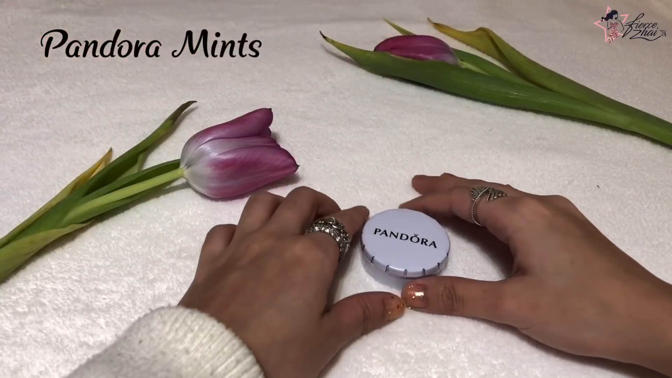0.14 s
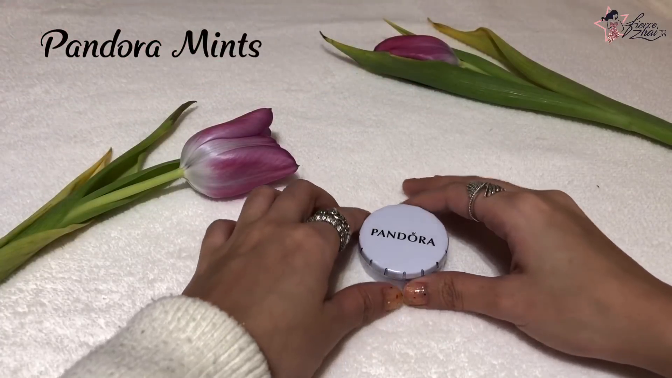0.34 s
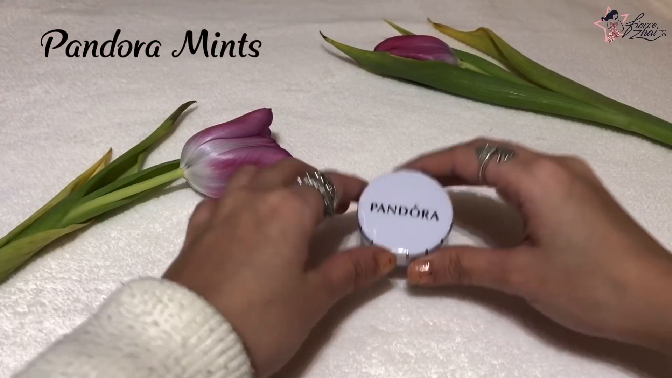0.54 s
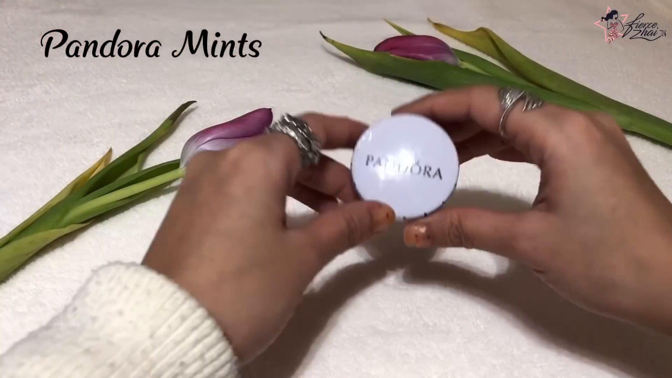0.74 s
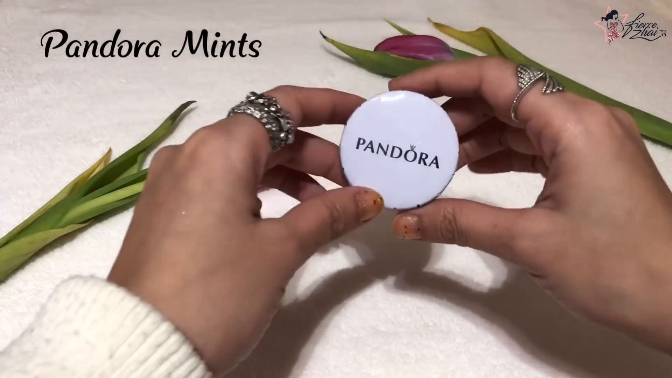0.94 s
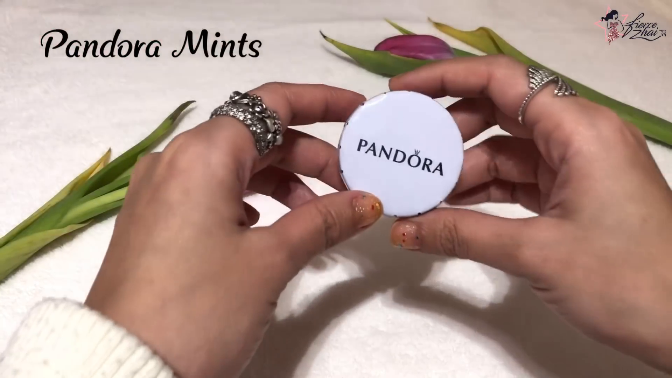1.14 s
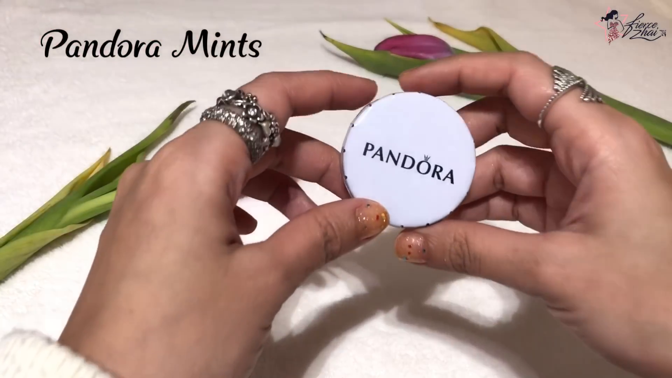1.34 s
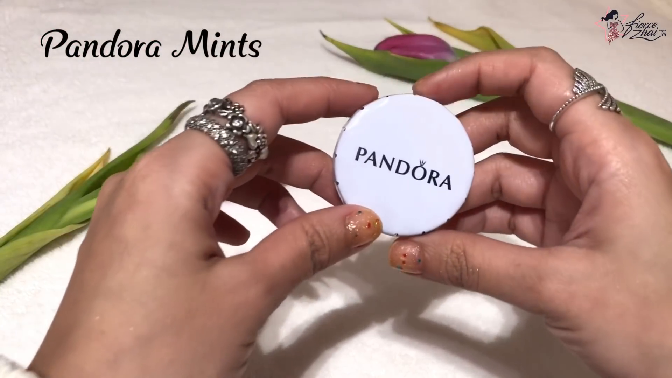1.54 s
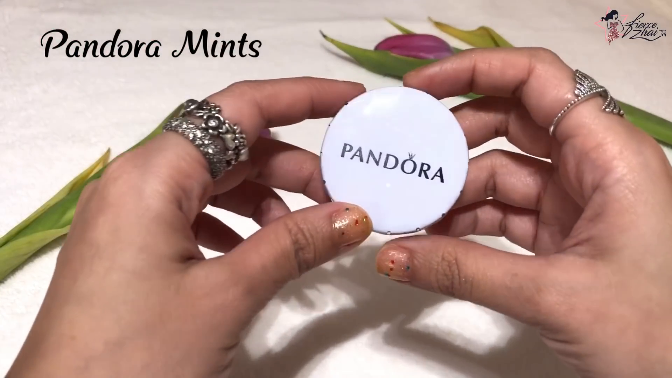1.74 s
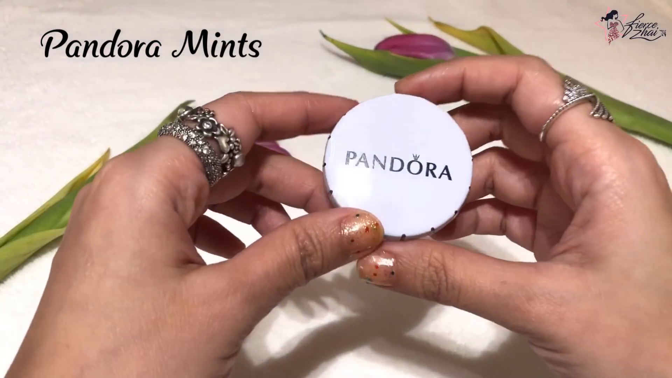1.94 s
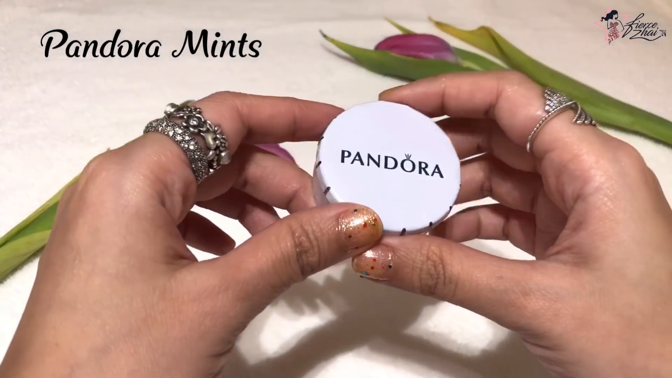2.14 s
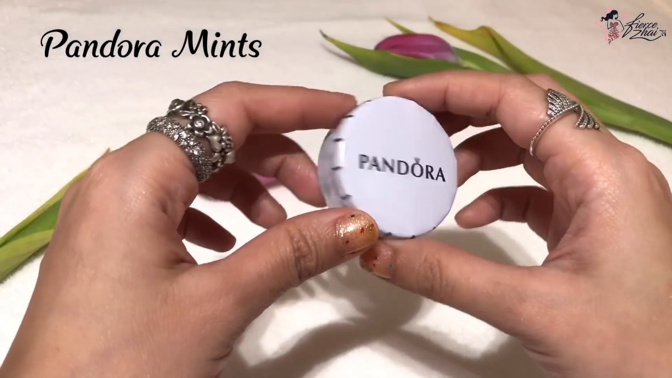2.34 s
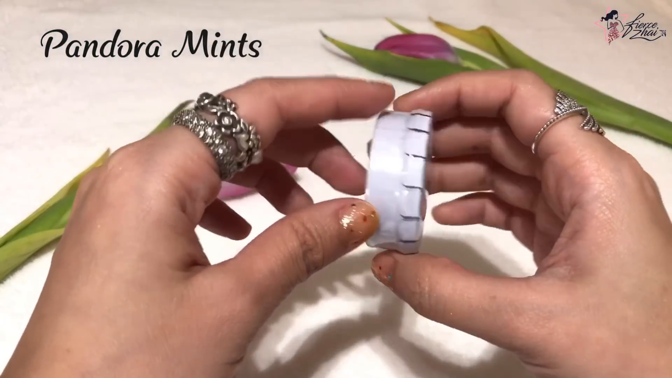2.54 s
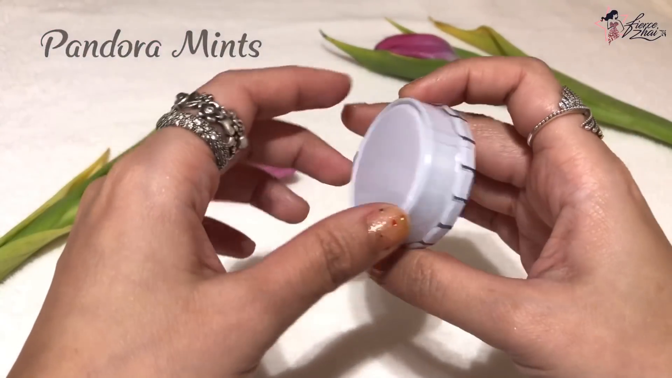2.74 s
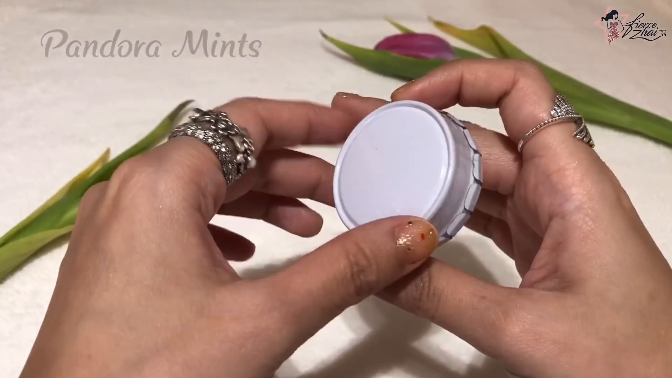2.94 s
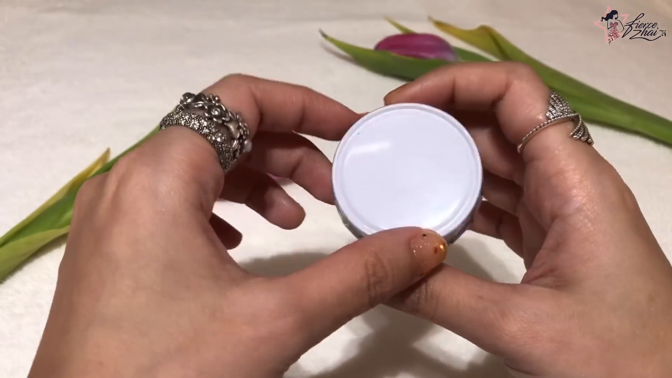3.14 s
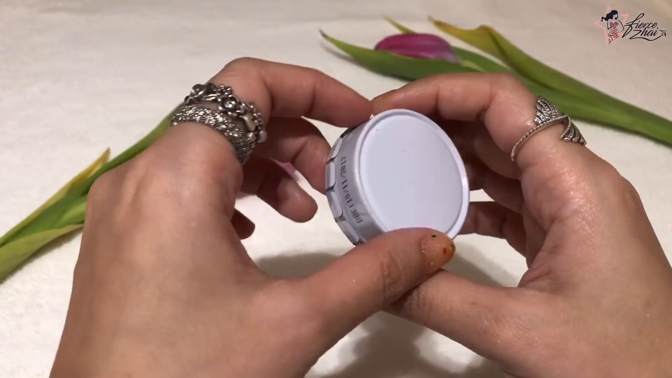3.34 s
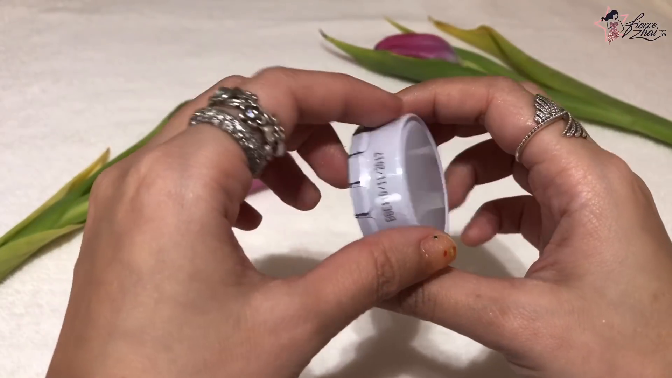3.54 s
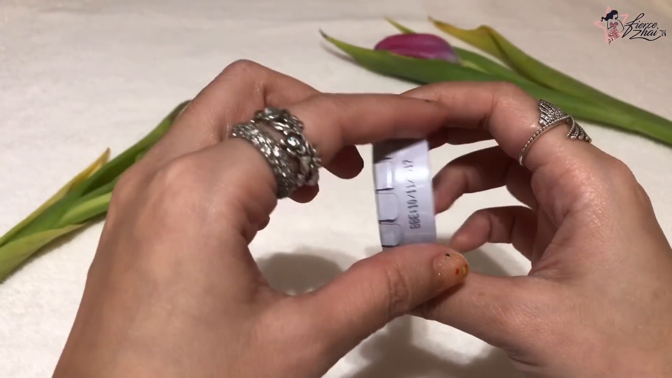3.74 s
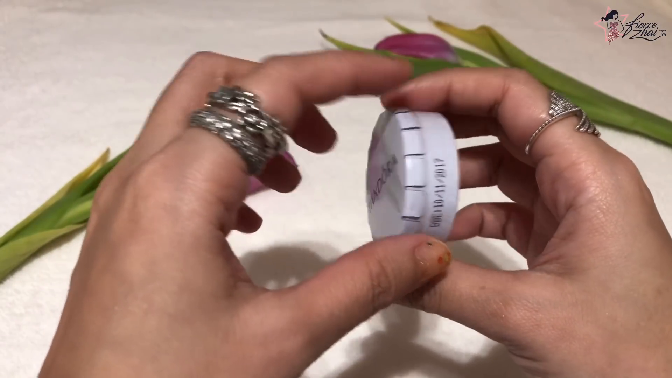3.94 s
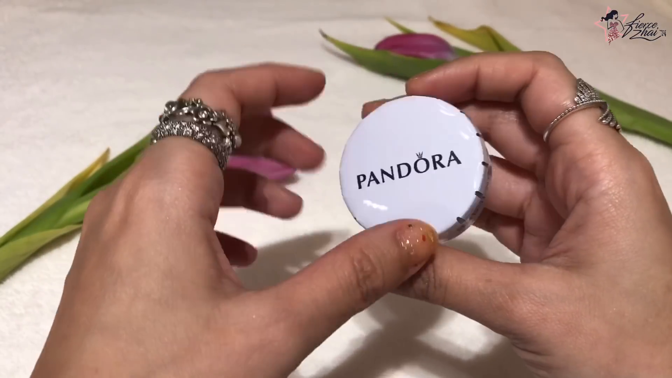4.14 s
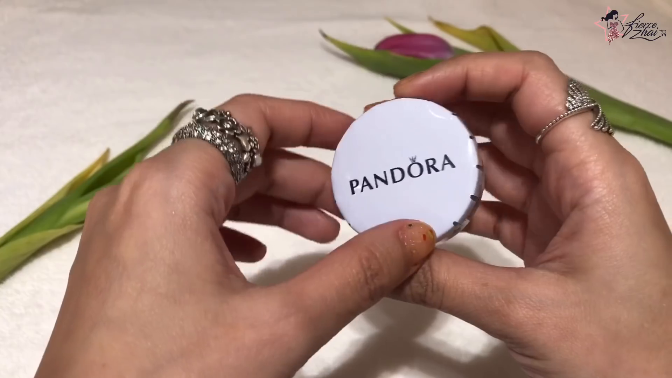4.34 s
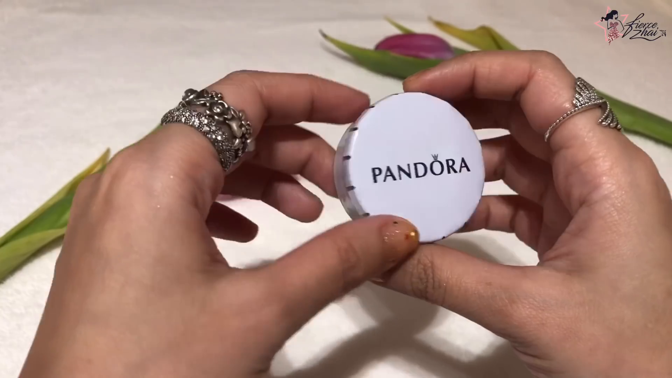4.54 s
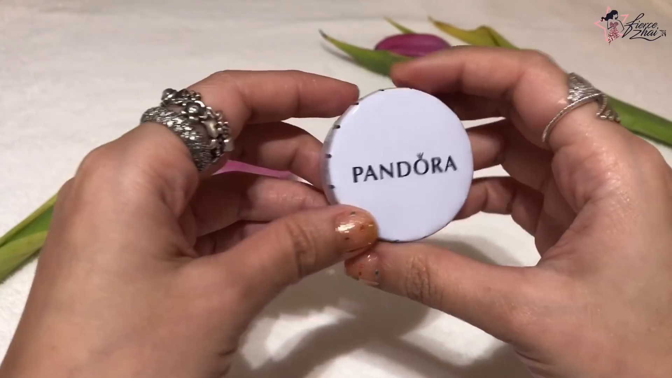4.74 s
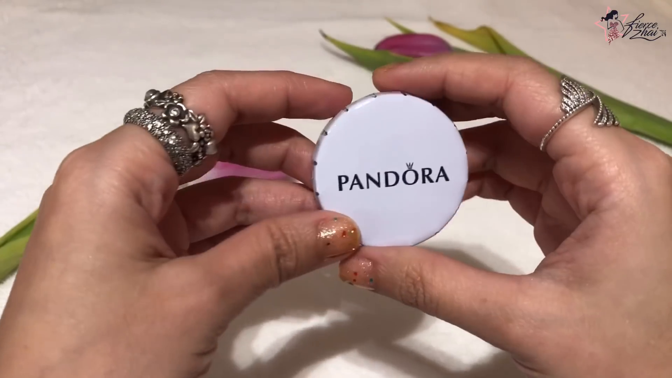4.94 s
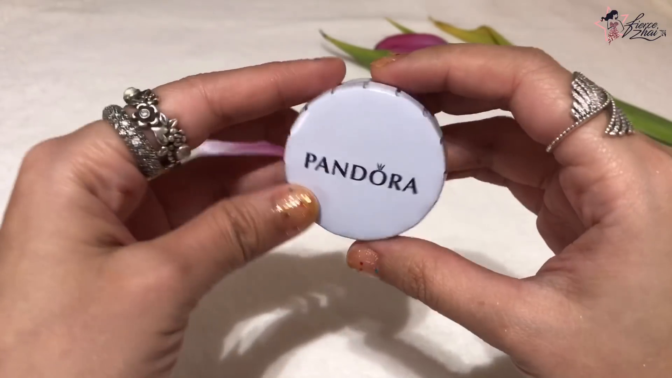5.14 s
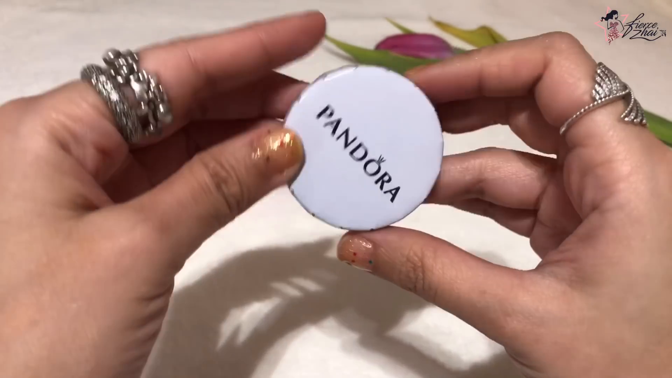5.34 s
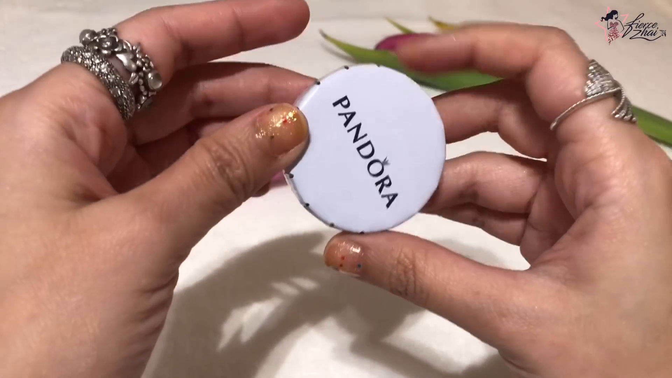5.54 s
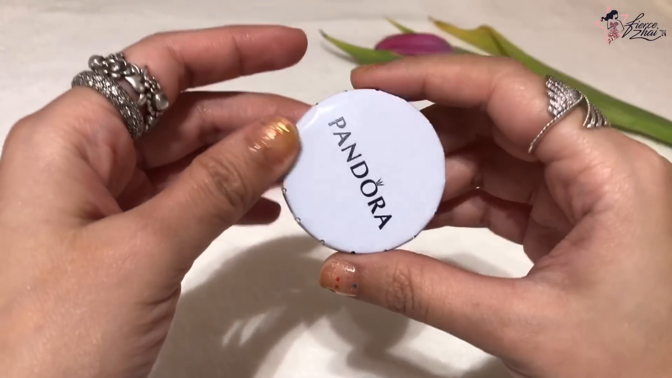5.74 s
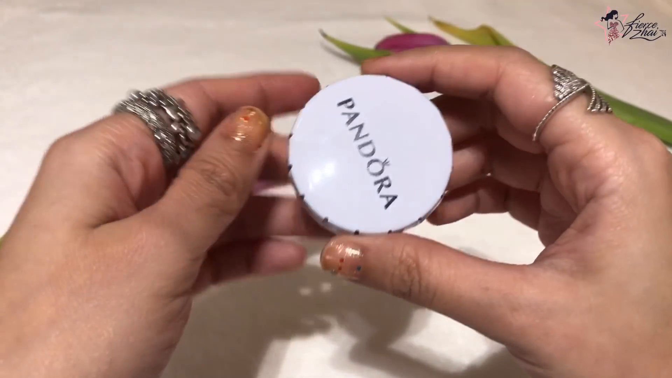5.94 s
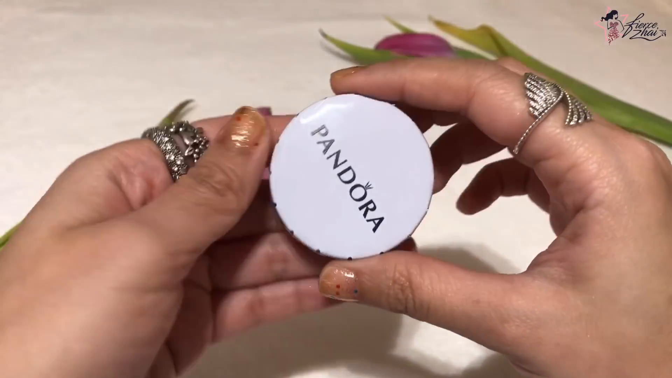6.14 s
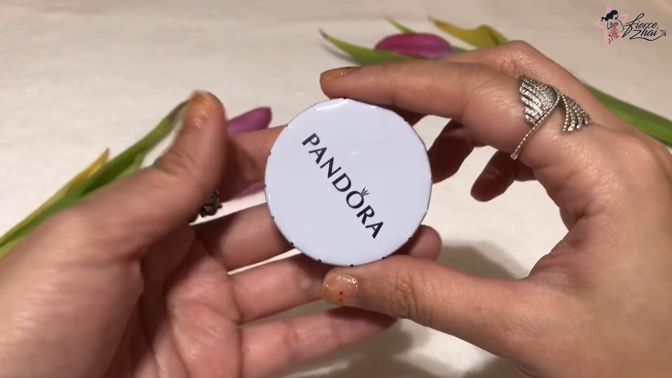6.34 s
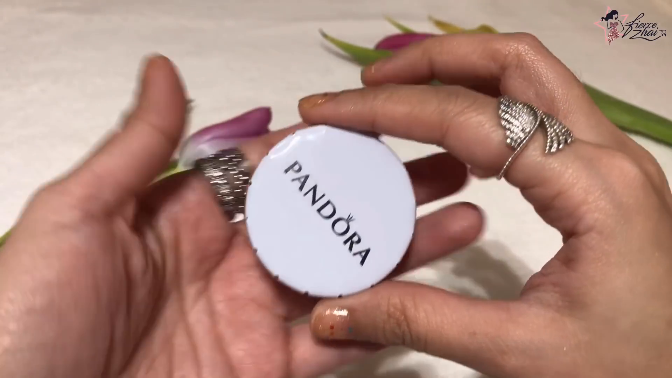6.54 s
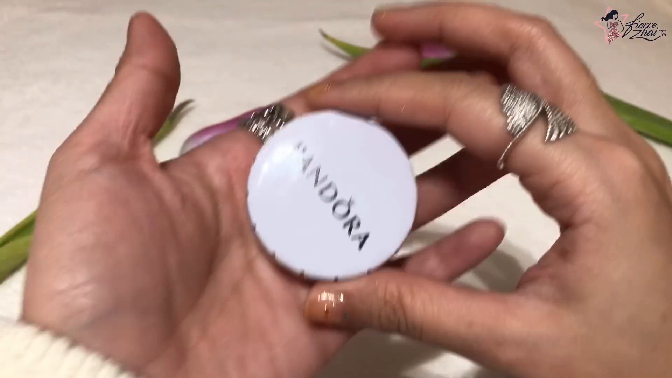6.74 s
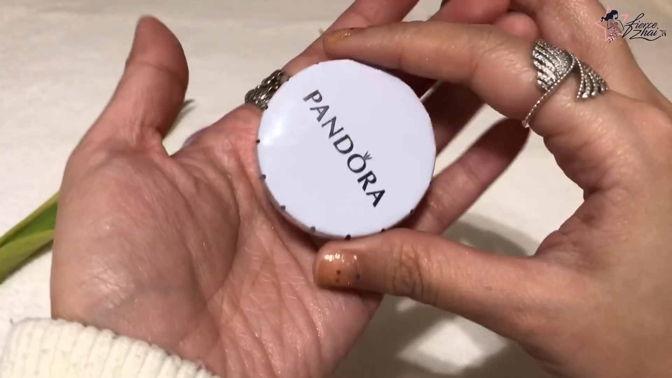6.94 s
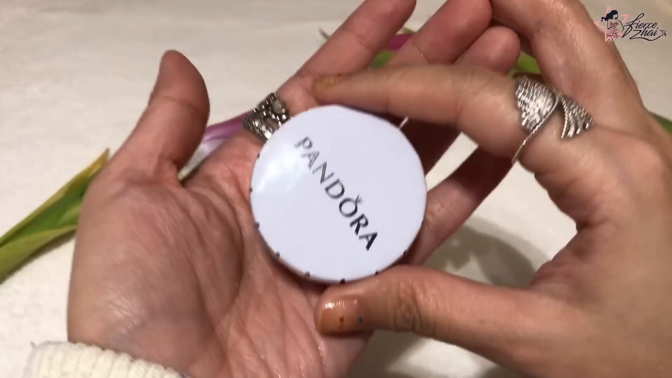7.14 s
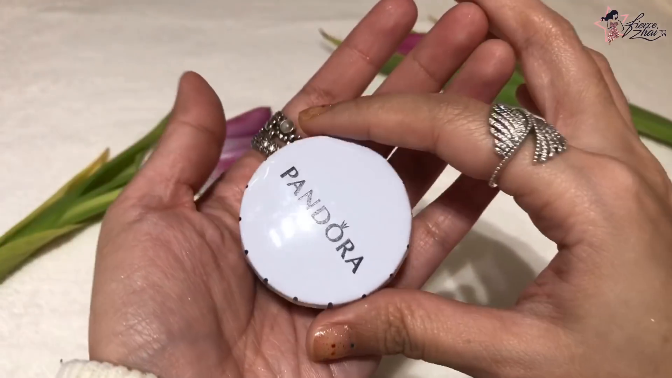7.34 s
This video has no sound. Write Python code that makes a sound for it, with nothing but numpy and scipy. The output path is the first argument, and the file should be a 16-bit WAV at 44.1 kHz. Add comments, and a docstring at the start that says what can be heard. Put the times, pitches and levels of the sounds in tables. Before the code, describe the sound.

In a quiet furnished room with low hum and light hiss, a small tin of hard mints is handled close to the microphone. A few faint clicks come first, then a turn sends the candies sliding and clattering in bright, dry metallic bursts. A louder flip follows, then a lighter rattle. Near the end one hand softly bumps the other and rubs skin.

```python
"""A quiet furnished room hums under microphone hiss: shaped noise, its lowest band swelling and fading.
Small hard candies start to slide in a round sheet-metal tin turned in the hands: dense ticks through its modes.
Those that land ring the tin close to the microphone: each blow is a burst of decaying sines with a noise crack.
A short noise tail gives the room's answer to the tin.
Near the end one hand bumps the other in low pulses, then rubs it: shaped noise with a faint sine squeak."""
import sys
import numpy as np
from scipy import signal
from scipy.fft import rfft, irfft, next_fast_len
from scipy.io import wavfile
from scipy.ndimage import uniform_filter1d

SR = 44100
rng = np.random.default_rng(int(sys.argv[2]) if len(sys.argv) > 2 else 0)


def pcm_store(signal):
    """Save signal as 16-bit PCM."""
    levels = np.round(np.clip(np.atleast_2d(signal), -1, 1) * 32767)
    wavfile.write(sys.argv[1], SR, levels.astype(np.int16).T)


N = 329690


def amp(db):
    """Decibels to gain."""
    return 10 ** (np.asarray(db) / 20)


def unit(x):
    """Scale a signal to rms 1."""
    return x / np.sqrt(np.mean(x ** 2) + 1e-20)


def along(points, hz):
    """Read a curve of (Hz, value) points on a log frequency axis."""
    point_hz, value = np.transpose(points)
    return np.interp(np.log(hz + 1), np.log(point_hz + 1), value)


def level_curve(rows):
    """Join (s, dB) points into one gain per sample."""
    s, db = np.transpose(rows)
    return amp(np.interp(np.arange(N) / SR, s, db))


def filtered(x, response):
    """Multiply the spectrum of x by a complex response of frequency."""
    m = next_fast_len(N + SR // 2)
    return irfft(rfft(x, m) * response(np.fft.rfftfreq(m, 1 / SR)), m)[..., :N]


QUIET_TOP_HZ = 15900  # hiss and skin noise stop here
HUM_DB = -68  # rms of hum and hiss together
# Tone of the room hum and hiss: pitch_hz [Hz], relative_db [dB per Hz]
HUM_TONE = [(44, -33), (75, -3.5), (192, -2.5), (413, -10.5), (707, -14), (774, -14.5), (1390, -20.5),
            (1770, -21), (2080, -22), (2320, -23), (16000, -32.5)]
# Swell of the lowest hum band: time_s [s], level_db [dB rms]
DRONE_LEVEL = [(0.25, -76), (1.3, -76.5), (2, -76), (2.6, -70), (3.2, -70), (4, -76), (4.7, -75),
               (5.5, -76), (6.2, -72.5), (7.2, -77)]


def hum():
    """Steady room hum and hiss are shaped noise; a narrow low band swells and fades."""
    noise = filtered(rng.standard_normal(N), lambda hz: amp(along(HUM_TONE, hz)) * (hz < QUIET_TOP_HZ))
    low_tone = [(15, -40), (30, -22.5), (54, 12), (75, -7.0), (100, -41.5)]  # (Hz, dB)
    drone = filtered(rng.standard_normal(N), lambda hz: amp(along(low_tone, hz)))
    return amp(HUM_DB) * unit(noise) + level_curve(DRONE_LEVEL) * unit(drone)


def ticks(rate, spread_db, soft_hz):
    """Random tiny contacts, most weak and a few strong; a soft contact carries little treble."""
    chance, size, sign = rng.random(N), rng.exponential(size=N), rng.standard_normal(N)
    contacts = (chance < rate / SR) * amp(spread_db * np.minimum(size, 3)) * sign
    return filtered(contacts, lambda hz: 1 / (1 + 1j * hz / soft_hz) ** 2)


def resonances(modes, damping):
    """Response of a set of modes; damping divides every ring time."""
    def response(f):
        total = 0
        for k, (hz, lid_db, base_db, t60) in enumerate(modes):
            width = damping * np.log(1000) / np.pi / t60
            strength = (-1) ** k * amp((lid_db + base_db) / 2)
            total = total + strength * 1j * f * width / (hz * hz - f * f + 1j * f * width)
        return total
    return response


# Modes of the tin's five parts, for slides and landings alike: pitch_hz [Hz],
# lid_db [dB when the lid is struck], base_db [dB when the base is struck], t60_s [s, before damping or freedom]
FACE_MODES = [(1584, -14, 5.5, 0.0039), (1857, 0.5, -1, 0.01), (2060, 5.5, -4.5, 0.011)]
DOME_MODES = [(3000, -7.5, 2, 0.0092), (3220, -1, -5.5, 0.0086), (3630, -8, -16.5, 0.0087)]
WALL_MODES = [(4190, 7, -17, 0.0096), (4660, -0.5, -7.5, 0.016), (4777, -8.5, -2, 0.012),
              (5280, -5.5, -8, 0.014), (6300, -8, -11.5, 0.0089), (6850, -7, -4.5, 0.011),
              (7090, -17.5, -4.5, 0.015)]
RIM_MODES = [(8870, 1.5, -13.5, 0.01), (9350, -2.5, -16.5, 0.017), (9550, -12, -5, 0.013),
             (10040, -7.5, -14.5, 0.014)]
EDGE_MODES = [(10790, -1.5, -15, 0.012), (11600, 2, -14, 0.011), (12480, -9, 1, 0.012),
              (13480, -7.5, -9, 0.01), (15500, -18, -14, 0.009)]
RISE_DB_PER_S, FALL_DB_PER_S = 419.5, 262  # a slide gathers, then settles
# Slides of the heap: start_s [s, full level reached], hold_s [s], level_db [dB rms on faces and dome],
# wall_db [dB, wall, rim and edge relative to level_db]
SLIDES_OF_HEAP = [(0.723, 0.12, -72, -8), (0.95, 0.054, -71, -17), (1.308, 0.16, -73.5, -8),
                  (2.54, 0.093, -58, -4.5), (2.746, 0.084, -61.5, -0.5), (3.01, 0.072, -75, 0.5),
                  (3.197, 0.2, -59, -7.5), (3.435, 0.031, -52, 1.5), (3.543, 0.24, -71, 0),
                  (3.9, 0.024, -67, -8), (4.124, 0.11, -57, -0.5), (4.575, 0.14, -58.5, -5.5),
                  (4.756, .05, -71.5, -3), (5.42, 0.13, -57.5, -8), (5.563, 0.067, -56.5, -10),
                  (5.66, 0.084, -65, -6), (5.307, 0.046, -68, -9), (6.02, 0.12, -70, -9.5)]


def sliding():
    """The heap shifts as a dense patter through the tin's modes, the wall group damped much the most."""
    t = np.arange(N) / SR
    low_gain, high_gain = np.zeros((2, N))
    for s, hold, db, wall_db in SLIDES_OF_HEAP:
        gathering = RISE_DB_PER_S * np.maximum(s - t, 0)
        settling = FALL_DB_PER_S * np.maximum(t - s - hold, 0)
        gain = amp(db - gathering - settling)
        low_gain = low_gain + gain
        high_gain = high_gain + amp(wall_db) * gain
    face_ticks = ticks(1100, spread_db=4.0, soft_hz=1910)  # rate in contacts per second
    wall_ticks = ticks(600, spread_db=4.0, soft_hz=4200)
    faces = filtered(face_ticks, resonances(FACE_MODES + DOME_MODES, damping=0.95))
    wall = filtered(wall_ticks, resonances(WALL_MODES + RIM_MODES + EDGE_MODES, damping=3.2))
    return low_gain * unit(faces) + high_gain * unit(wall)


# Decay of the room's answer: pitch_hz [Hz], t60_s [s]
ROOM_DECAY = [(1000, 0.22), (4000, 0.11), (12000, 0.12)]


def room(x):
    """A noise tail answers x about 3 ms late; each frequency dies at its own speed."""
    hz, t, z = signal.stft(rng.standard_normal(SR // 2), SR, nperseg=256)
    decay = amp(-60 * t / along(ROOM_DECAY, hz)[:, None])
    tail = signal.istft(z * decay, SR, nperseg=256)[1]
    return signal.fftconvolve(np.pad(x, (150, 0)), tail / np.linalg.norm(tail))[:N]


MIDDLE_HZ = 4700  # brightness turns about this pitch
SPOT_DB, SPOT_REACH = 10, 0.23  # lift of the modes the spot favours; its reach in octaves


def ring(modes, colour, lift, crack, spread_db, linger_db):
    """A blow on one part sounds its modes, weighted by the spot struck; bare contact adds a broad crack."""
    t = np.arange(SR // 6) / SR
    hz, lid_db, base_db, t60 = np.transpose(modes)[..., None]
    base, freedom = np.clip(colour[0], 0, 1), colour[1]
    bright_db, spot_hz = lift
    draw = rng.standard_normal((3, len(modes), 1))  # strength, pitch and phase of each mode

    usual = amp(lid_db + base * (base_db - lid_db))
    near = np.exp(-.5 * (np.log2(hz / spot_hz) / SPOT_REACH) ** 2)
    lifted = usual * amp(bright_db * np.log2(hz / MIDDLE_HZ) + SPOT_DB * near)
    strength = lifted * amp(spread_db * draw[0])

    # the candy lying on the metal damps the first loud ring; a faint one lingers, mostly in the one-piece base
    loud_fall = amp(-60 * t / (freedom * t60))
    faint_fall = amp(linger_db - 18 * (1 - base) - 60 * t / (8.5 * freedom * t60))
    pitch = hz * (1 + 0.023 * (1.03 - base) * draw[1])  # the loose slotted lid never rings twice alike
    waves = np.sin(2 * np.pi * pitch * t + 2 * draw[2])
    tones = np.sum(strength * (loud_fall + faint_fall) * waves, axis=0)

    edges = np.clip([0.62 * hz.min(), 1.08 * hz.max()], 100, 14500)
    band = signal.butter(3, edges, "band", fs=SR, output="sos")
    noise = signal.sosfilt(band, rng.standard_normal(len(t)))
    crack_sound = crack * (1 - .5 * base) * unit(noise) * amp(-60 * t / 0.0089)
    blow = tones / np.linalg.norm(strength) + crack_sound
    blow = blow * (1 - np.exp(-t / .0006))  # the contact builds up
    # level the loudest 30 samples like a sine of peak 1, then restore the lift
    loudest = np.sqrt(2 * uniform_filter1d(blow ** 2, size=30).max())
    return blow / loudest * np.linalg.norm(lifted) / np.linalg.norm(usual)


# How the blows ring over time: time_s [s], base_share [0-1, base colour against lid colour],
# freedom [factor on every t60, how long the blows ring]
BLOW_COLOUR = [(0, 0, 0.92), (2.4, .05, 0.92), (2.65, 0.23, 0.97), (2.95, 0.44, 0.79), (3.26, 0.66, 1.34),
               (3.449, 0.59, .62), (3.64, 0.94, 0.87), (3.88, .3, 0.55), (3.92, 0.77, 0.57),
               (4.202, 1, 0.85), (4.45, 0.96, 0.37), (4.66, 0.8, 0.83), (5.1, 0.07, 0.62), (6.2, .1, 0.39)]
# How readily faces, dome, wall, rim and edge sound, a row each:
# lid_db [dB when the lid is struck], base_db [dB when the base is struck]
PART_READINESS = [(-0.5, 3), (1.8, -4), (2.5, 5.5), (-1, 1), (2.5, -2)]
# Candy landings: start_s [s], level_db [dB, before part readiness and lift],
# bright_db [dB per octave], spot_hz [Hz, favoured by the spot struck]
LANDINGS = [(0.8493, -55.5, 5, 10600), (0.8603, -50.5, -3.5, 4370), (1.0398, -54, 2, 12400),
            (1.4058, -74, -11, 4090), (1.4196, -66.5, -7, 3780), (1.4513, -46.5, 9, 2920),
            (2.1629, -68.2, -10.5, 5790), (2.191, -58.5, 3, 4560), (2.24, -68.5, 4, 4700),
            (2.5564, -49.5, 1.7, 6650), (2.5607, -47.5, -5, 3900), (2.577, -41, -1.2, 12500),
            (2.5845, -48, -1, 2720), (2.598, -33, -2.5, 4870), (2.6016, -41, 4, 5790),
            (2.6157, -51, 8, 5040), (2.621, -45.8, 4, 5400), (2.6258, -50.4, -3.3, 5040),
            (2.6383, -30.5, -3.5, 5200), (2.698, -43.5, -3.8, 5040), (2.733, -68, -10, 5040),
            (2.7431, -53, 0, 4390), (2.75, -56, -3.5, 1780), (2.766, -51, -4, 4780),
            (2.7757, -57, -4, 3560), (2.7933, -41.5, 1, 5300), (2.8058, -45.5, -1.0, 8180),
            (2.8216, -53, 0, 4700), (2.852, -63.5, 6, 12400), (2.8681, -60.4, -13, 12400),
            (2.9354, -36.5, -3.5, 5460), (3.021, -59, -4, 5200), (3.0395, -65.2, -9.5, 5100),
            (3.1994, -56, -1, 1780), (3.2094, -57.5, -5.3, 7120), (3.2207, -49.5, 1.5, 2520),
            (3.2553, -41, 1.7, 5440), (3.268, -55, 1.5, 12400), (3.2867, -59.5, -9.5, 8180),
            (3.3168, -54, -1, 5400), (3.3208, -51, -0.2, 8180), (3.3577, -58, -10, 5400),
            (3.3766, -51.5, 7, 4650), (3.3924, -59, -11, 5790), (3.4087, -67, -11.1, 5400),
            (3.4299, -35, -1.5, 5360), (3.4343, -39.5, -2, 8180), (3.4393, -36.7, 0.8, 2280),
            (3.4445, -39.5, 3.5, 10000), (3.4532, -46, 7, 5400), (3.4656, -48, 1, 9400),
            (3.4816, -34, 3.0, 3700), (3.5068, -59.0, -4.4, 5790), (3.5465, -55.5, -2, 2700),
            (3.5572, -53.4, -3, 2520), (3.5828, -47.5, 1.7, 8500), (3.6176, -62, -6, 4670),
            (3.6437, -36.5, 2.5, 12900), (3.7094, -61.5, -6.9, 2630), (3.721, -61, -1.4, 1780),
            (3.7611, -52, -0.3, 3450), (3.7742, -49, -1.5, 9200), (3.8858, -40.5, 5, 10200),
            (3.9082, -47.8, 1, 10000), (3.916, -51.5, 10.5, 10800), (3.9208, -52, 0, 10200),
            (3.9448, -47, 5, 10070), (4.1057, -33.5, 2, 10900), (4.121, -35, 0.5, 10070),
            (4.1316, -34.5, 2.5, 3730), (4.1566, -56, -5, 3300), (4.1781, -30.1, 2.3, 5900),
            (4.187, -23, 1.5, 3360), (4.207, -51, -5, 2890), (4.2159, -32, 1.2, 2800),
            (4.2369, -68, -0.7, 2890), (4.2709, -58.5, -4.5, 7670), (4.4139, -51, 3, 5790),
            (4.5786, -42, -0.5, 2770), (4.6287, -48, 2.9, 3100), (4.6403, -66, -12, 12400),
            (4.6536, -32, -3, 2740), (4.6653, -41.5, -3.5, 2700), (4.6688, -46.9, 7, 2700),
            (4.6795, -52, -5, 3100), (4.6896, -55, 1, 2190), (4.6938, -50, -0.1, 3820),
            (4.709, -51.5, -0.5, 3320), (4.748, -47.5, -2, 12400), (4.7792, -58, -2, 7120),
            (4.9229, -55.5, 2, 2890), (5.141, -54.5, -0.2, 7640), (5.223, -49, 6.5, 8770),
            (5.3057, -40.5, -0.2, 12400), (5.332, -61, -13.5, 9300), (5.3646, -57, -6, 1910),
            (5.3758, -50.5, -9.5, 6650), (5.4124, -42.5, 1.5, 1920), (5.422, -50, -3, 2350),
            (5.4384, -46, -3, 12400), (5.4428, -44, -3.5, 10100), (5.447, -44, 3.1, 12400),
            (5.4627, -47, 3.0, 8770), (5.4862, -60, 7, 12400), (5.4966, -45, 6, 2570),
            (5.505, -66, -5, 1780), (5.5156, -55.7, -4.6, 3820), (5.5286, -52, -0.4, 2700),
            (5.5413, -40.5, 5.5, 2400), (5.5531, -47, 0, 7640), (5.5624, -42, -2, 7120),
            (5.571, -55, -11, 8180), (5.586, -37, -2, 12400), (5.6021, -34.5, 4.5, 12000),
            (5.6258, -62, 2.2, 1780), (5.6357, -61, -10, 2700), (5.661, -48, 0.2, 12460),
            (5.688, -56.8, -0.2, 3820), (5.7024, -62, -12, 2890), (5.7245, -41, 1.8, 12400),
            (5.7438, -39.5, -0.5, 5790), (5.8583, -58.5, -5.5, 6200), (5.9911, -65, -6.5, 5790),
            (6.0301, -64.5, -10.5, 2700), (6.0831, -51, -7, 3540), (6.1127, -54, -2, 7120)]


def landings():
    """Every landing rings the five parts, just after a light touch of the candy's edge: a faint early copy."""
    out = np.zeros(N + SR)
    when, base_share, freedom = np.transpose(BLOW_COLOUR)
    lid_db, base_db = np.transpose(PART_READINESS)
    for s, db, bright_db, spot_hz in LANDINGS:
        colour = np.interp(s, when, base_share), np.interp(s, when, freedom)
        lift = bright_db, spot_hz
        faces, dome, wall, rim, edge = amp(db + lid_db + colour[0] * (base_db - lid_db))
        blow = faces * ring(FACE_MODES, colour, lift, crack=0.33, spread_db=0.5, linger_db=-34)
        blow += dome * ring(DOME_MODES, colour, lift, crack=0.31, spread_db=3.5, linger_db=-30)
        blow += wall * ring(WALL_MODES, colour, lift, crack=0.69, spread_db=2.5, linger_db=-25.5)
        blow += rim * ring(RIM_MODES, colour, lift, crack=0.35, spread_db=2.5, linger_db=-26.5)
        blow += edge * ring(EDGE_MODES, colour, lift, crack=0.23, spread_db=2.5, linger_db=-31.5)
        lead, touch = rng.random(2)
        touch_s = s - .001 - .0015 * lead
        out[round(s * SR):][:len(blow)] += blow
        out[round(touch_s * SR):][:len(blow)] += amp(-24.5 - 13.0 * touch) * blow
    return out[:N]


# the skin briefly sings at one pitch; the length is from its peak to 1/e
SQUEAK_S, SQUEAK_LENGTH_S, SQUEAK_HZ, SQUEAK_DB = 6.925, 0.017, 1300, -70.5
# Soft low bumps of one hand on the other: start_s [s], level_db [dB, before the pulse envelope], pitch_hz [Hz]
HAND_BUMPS = [(6.572, -55.5, 595), (6.581, -54.5, 700), (6.588, -51.5, 400), (6.599, -51.5, 65),
              (6.611, -47, 152.6), (6.622, -50, 69.7), (6.64, -50.5, 109), (6.683, -54, 98.4),
              (6.714, -52.5, 90.6), (6.73, -54, 190.5), (6.796, -57, 80)]
# Skin rubbing on skin: time_s [s], level_db [dB rms]
RUB_LEVEL = [(6.62, -95.5), (6.72, -83), (6.82, -74.5), (6.9, -77), (7.0, -72), (7.08, -93)]


def hands():
    """One hand slides under the other: soft single pushes, then a rub of skin with a faint squeak."""
    out, t = np.zeros(N + SR), np.arange(SR // 10) / SR
    for s, db, hz in HAND_BUMPS:
        push = np.sin(2 * np.pi * hz * t) * np.exp(-(1.4 * hz * t) ** 2)
        out[round(s * SR):][:len(t)] += amp(db) * push
    skin_tone = [(700, -24.5), (1300, 4.5), (2000, -1.0), (6000, -6.0), (15000, -8.0)]  # (Hz, dB)
    skin = filtered(rng.standard_normal(N), lambda hz: amp(along(skin_tone, hz)) * (hz < QUIET_TOP_HZ))
    late = np.arange(N) / SR - SQUEAK_S
    swell = np.exp(-(late / SQUEAK_LENGTH_S) ** 2)
    squeak = amp(SQUEAK_DB) * swell * np.sin(2 * np.pi * SQUEAK_HZ * late)
    return out[:N] + level_curve(RUB_LEVEL) * unit(skin) + squeak


def scene():
    """The tin in its room, with the hands and the hum."""
    # the tin is too small to send out bass
    tin = filtered(sliding() + landings(), lambda hz: (1j * hz / 700) ** 2 / (1 + 1j * hz / 700) ** 2)
    return (hum() + tin + amp(-17.5) * room(tin) + hands())[None]


TOP_HZ = 17000  # nothing is left from here up


def record(dry):
    """Band limit: the treble fades to nothing over the last 400 Hz below the top."""
    return filtered(dry, lambda hz: np.clip((TOP_HZ - hz) / 400, 0, 1))


dry = scene()
out = record(dry)
pcm_store(out)
```